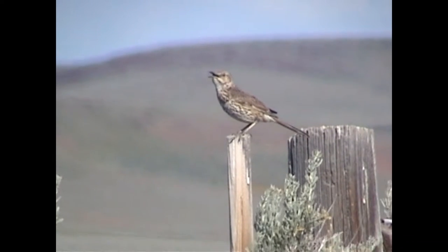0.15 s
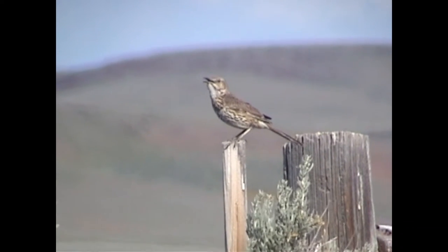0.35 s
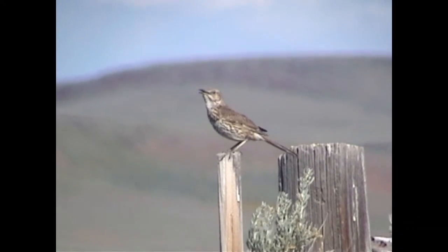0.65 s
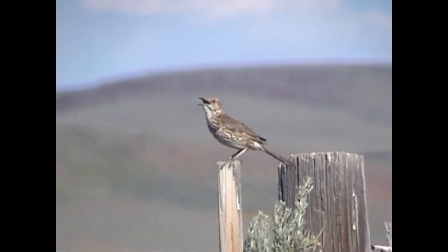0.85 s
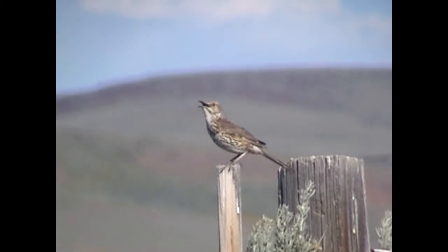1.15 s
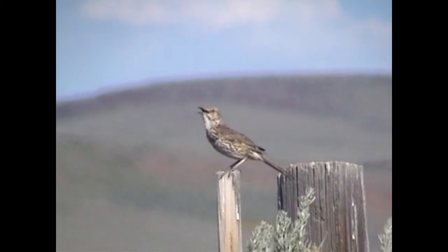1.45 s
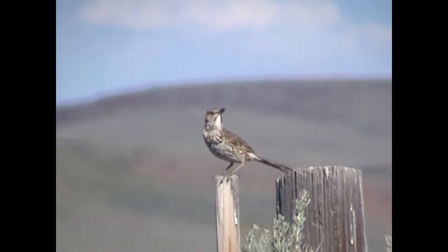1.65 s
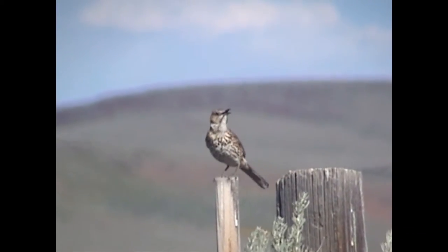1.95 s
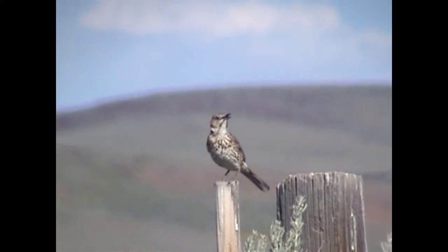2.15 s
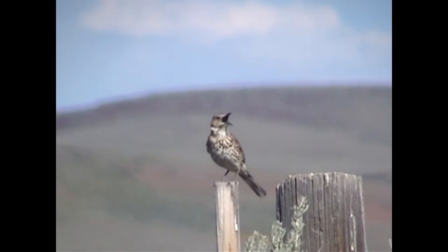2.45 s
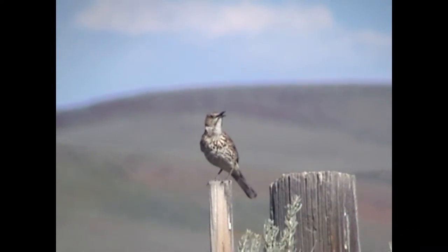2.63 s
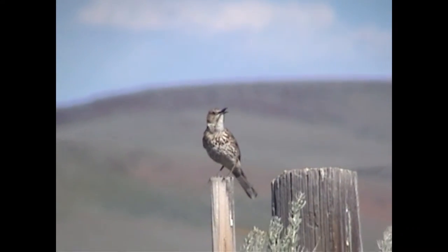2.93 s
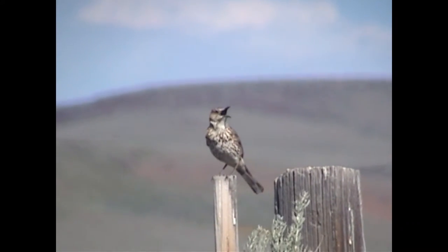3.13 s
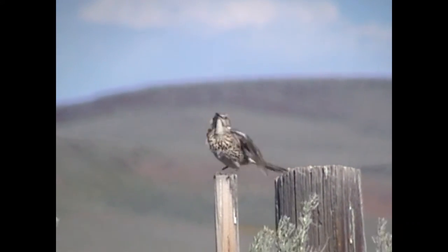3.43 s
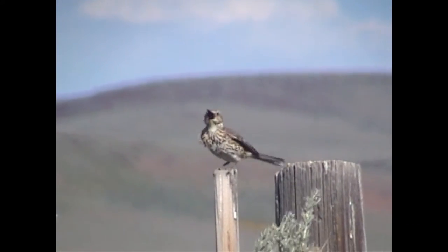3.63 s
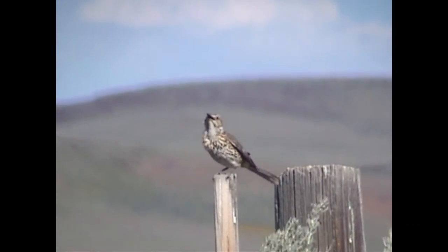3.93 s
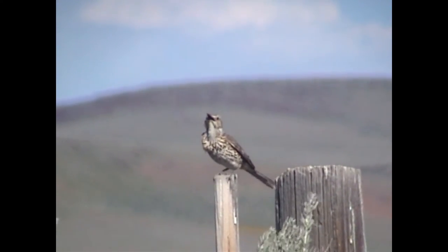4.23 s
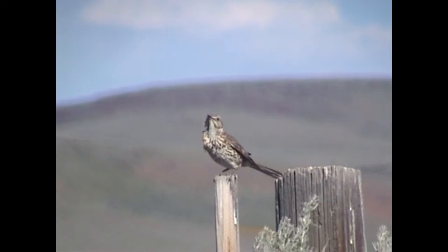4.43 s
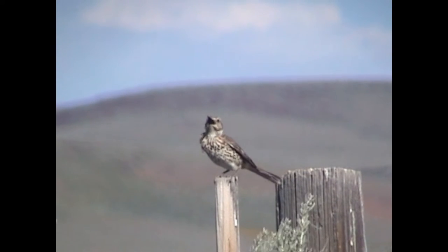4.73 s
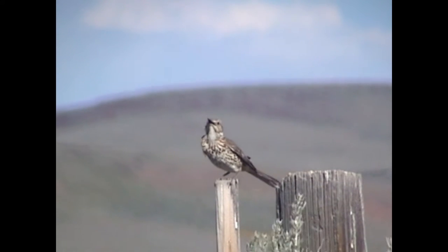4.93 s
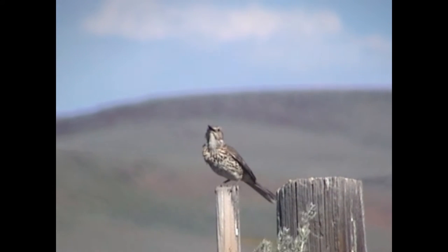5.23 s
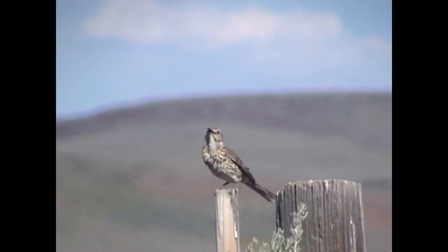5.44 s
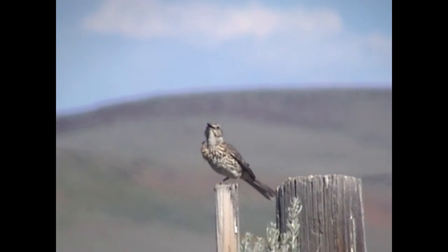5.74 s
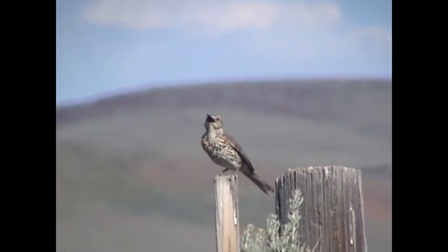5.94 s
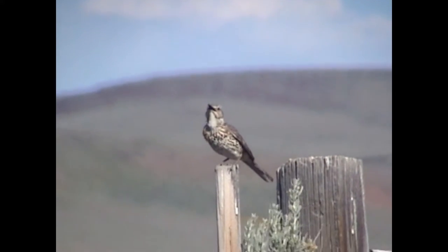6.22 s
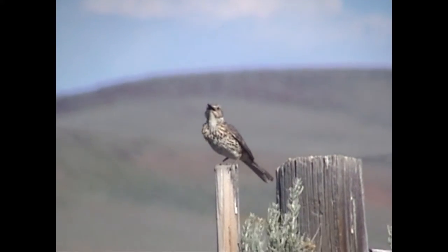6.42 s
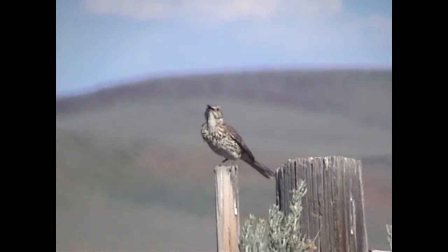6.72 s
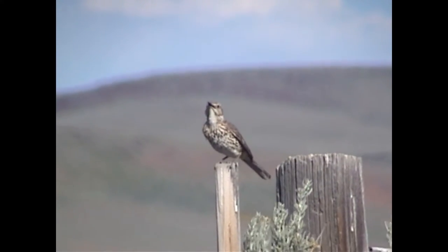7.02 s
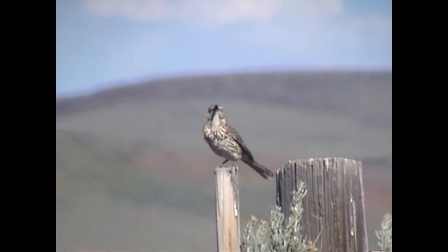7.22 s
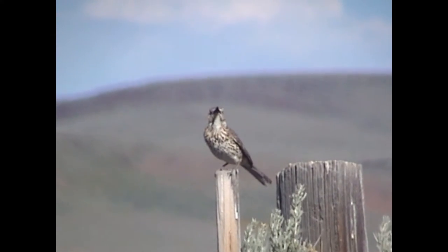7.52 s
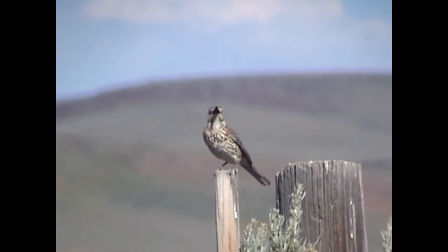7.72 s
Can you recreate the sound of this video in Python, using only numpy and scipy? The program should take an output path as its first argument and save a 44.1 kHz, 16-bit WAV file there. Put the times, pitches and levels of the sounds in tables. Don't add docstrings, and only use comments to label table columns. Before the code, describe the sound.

Open windy grassland, camcorder microphone without a windshield. A bird warbles continuously from the start, beginning with a falling trill and low whistles, then repeated buzzes, louder bright high notes and sweet sinking cadences, later rolling rattles and scooping chirps. Wind rumble rises in uneven gusts, strongest around four seconds and six to seven, sometimes distorting and crackling, then eases as jumbled chatter ends the song.

```python
import sys
import numpy as np
from scipy import signal
from scipy.fft import rfft, irfft, next_fast_len
from scipy.io import wavfile
from scipy.ndimage import uniform_filter1d, minimum_filter1d

SR = 44100
rng = np.random.default_rng(int(sys.argv[2]) if len(sys.argv) > 2 else 0)


def to_linear_factor(level_db):
    exponent = np.asarray(level_db, float) / 20
    return 10 ** exponent


def materialize(psi):
    bounded = np.clip(np.atleast_2d(psi).T, -1, 1)
    quanta = np.round(bounded * 32767).astype(np.int16)
    wavfile.write(sys.argv[1], SR, quanta)


N = 347067

# (throb_lead_warbles, first_throb_db, last_throb_db), then
# after_start_s, centre_hz, swing_hz, level_db, warbles_done.
PAIR = dict(strokes=[[(0, 1900, -37), (.014, 2150, -29), (.023, 2200, -37)], [(.016, 1620, -39),
        (.03, 1740, -33), (.043, 1740, -35), (.052, 1800, -43)]])
BUZZ = dict(strokes=[[(-.001, 1600, -29), (.003, 2250, -24)], [(-.001, 2800, -42), (.002, 4400, -44)]],
        trill=((.1, 3, 6), [(.002, 2230, 130, -23, .1), (.018, 2300, 120, -24, 2.4),
        (.021, 2320, 120, -35, 2.9), (.026, 2320, 150, -27, 3.6), (.042, 2380, 190, -32, 6),
        (.052, 2650, 60, -33, 7.5), (.062, 2600, 40, -42, 9)]))
ARCH = dict(strokes=[[(0, 3600, -25), (.012, 4750, -28), (.026, 4850, -27), (.036, 3900, -18)]])
SHIVER = dict(trill=((-.09, 3, 4), [(0, 3950, 230, -13.5, -.27), (.075, 4010, 75, -30, 4.9)]))
ROLL = dict(strokes=[[(0, 2250, -36), (.012, 2620, -24), (.02, 2850, -22), (.024, 4100, -37)],
        [(.066, 2300, -31), (.071, 1850, -35)], [(.079, 2000, -32), (.086, 2200, -36)]], trill=((.6, 3, 6),
        [(.027, 2760, 600, -23, .45), (.052, 2900, 750, -25, 2.25), (.067, 3200, 950, -27, 3.25),
        (.081, 3300, 900, -28, 4.2)]))
SCOOP = dict(strokes=[[(-.002, 2350, -35), (.008, 2900, -23), (.012, 3400, -29), (.019, 6000, -48)],
         [(.013, 1900, -35), (.021, 3500, -33), (.026, 2700, -24), (.031, 1940, -30), (.047, 1940, -28),
         (.068, 2040, -22.5), (.109, 1910, -26), (.118, 2850, -31)]])
CHIPS = dict(strokes=[[(-.002, 2350, -34), (.009, 2650, -27), (.013, 3100, -26)], [(-.004, 3800, -40),
         (0, 3200, -36)], [(.051, 2150, -33), (.066, 2720, -20), (.073, 2650, -30)], [(.05, 3600, -44),
         (.053, 2900, -40)]])
CADENCE = dict(strokes=[[(0, 2280, -33), (.015, 2490, -25), (.036, 2230, -20), (.089, 2255, -28)],
           [(.131, 2900, -33), (.139, 2420, -27), (.15, 2640, -20), (.156, 3300, -27), (.162, 2600, -21),
           (.171, 2250, -24)], [(.183, 2420, -27), (.197, 2130, -17), (.204, 2000, -27), (.208, 2350, -25),
           (.215, 2050, -27)]])
LADDER = dict(strokes=[[(0, 1850, -41), (.007, 2500, -33), (.042, 2680, -27), (.05, 2550, -23),
          (.068, 2530, -18), (.1, 2420, -24), (.106, 2600, -25)], [(.108, 2600, -24), (.125, 2480, -27),
          (.13, 2400, -26), (.139, 2520, -26), (.141, 2750, -25), (.146, 2500, -27), (.153, 2450, -33)],
          [(.157, 2350, -29), (.17, 2420, -24), (.175, 2720, -26), (.179, 2450, -29)]])


def bird(edge_share=.15, shortest_s=.003, longest_s=.007, waver=.0045, flutter_db=1.1):
    early_pipe = {2: [(3300, -31), (4000, -39), (4700, -43), (5400, -48), (6800, -46), (7800, -32),
                  (9800, -22)], 3: [(5000, -50), (7000, -50), (8000, -40), (10000, -48), (14000, -54)]}
    late_pipe = {2: [(3900, -26), (4500, -46), (5200, -42), (6200, -44), (7800, -33), (9600, -24)],
                 3: [(5500, -46), (6800, -44), (7800, -37), (9500, -46), (12000, -38), (14000, -45)]}
    turn_s = 3.66
    echo_db, echo_t60_s, echo_rise_s = -15, 0.092, 0.0019
    song = np.zeros(N)
    unsteady = np.pad([walk(260), walk(220)], ((0, 0), (0, SR)))
    for rows in song_notes():
        edge_s = np.clip(edge_share * (rows[-1][0] - rows[0][0]), shortest_s, longest_s)
        start, (hz, db) = played(rows, edge_s)
        drift, flutter = unsteady[:, max(int(start * SR), 0):][:, :len(hz)]
        strain = np.clip(np.abs(np.gradient(hz)) * SR / 40000, 0, 1)
        hz = hz * (1 + waver * drift * (1 + 7 * strain))
        db = db + flutter_db * flutter * (1 + 2.5 * strain)
        pipe = early_pipe if start < turn_s else late_pipe
        add(song, start, whistle(hz, db, edge_s, pipe, 3.5 * strain))
    t = np.arange(SR // 4) / SR
    tail = rng.standard_normal(len(t)) * to_linear_factor(-60 * t / echo_t60_s) * np.clip(t / echo_rise_s, 0, 1)
    tail = tail / np.sqrt(np.sum(tail ** 2))
    return song + to_linear_factor(echo_db) * signal.fftconvolve(song, tail)[:N]


def song_notes():
    # (throb_lead_warbles, first_throb_db, last_throb_db), then start_s,
    # centre_hz, swing_hz, level_db, warbles_done
    trills_and_steps = [
        ((.55, 1, 5), [(.29, 2560, 10, -29, -1.6), (.31, 2500, 20, -26, -1), (.352, 2400, 60, -30, .25), (.483, 2330, 110, -33, 4.25)]),
        ((-.1, 7, 5), [(2.301, 2100, 320, -37, .1), (2.315, 2170, 340, -25, 2.25), (2.334, 2200, 380, -23, 5.05)]),
        ((.4, 9, 1), [(2.669, 2516, 210, -41, -.5), (2.688, 2250, 80, -26, 1.7), (2.72, 2090, 16, -16, 3.5)]),
        ((-.2, 3, 2), [(5.85, 2950, 400, -30.5, -.16), (5.89, 2930, 830, -20.5, 4.27), (5.9035, 3200, 1200, -24, 5.25), (5.91, 3200, 1150, -26, 5.75)]),
        ((-.2, 4, 1), [(6.493, 2950, 350, -31, -.15), (6.531, 2950, 800, -24, 4.25), (6.5405, 3080, 1000, -25, 5.25), (6.555, 3350, 1430, -27, 6.25), (6.573, 3500, 1650, -27, 7.25), (6.593, 3050, 950, -27, 8.25), (6.6, 3000, 600, -36, 8.75), (6.612, 3000, 600, -27, 9.5)]),
                        ((.1, 4, 4), [(1.912, 1800, 120, -36, -.4), (1.922, 2150, 200, -34, .75), (1.949, 3750, 200, -19, 4.25), (1.96, 3950, 100, -30, 5.6)]),
        ((.1, 2, 3), [(1.911, 3400, 240, -32, -.4), (1.918, 3850, 200, -27, .3), (1.922, 4200, 400, -29, .75), (1.949, 7500, 400, -38, 4.25), (1.96, 7900, 200, -46, 5.6)]),
        ((.58, 7, 0.5), [(2.0, 2600, 200, -27, .3), (2.019, 2480, 200, -23, 1.25), (2.041, 2250, 90, -19, 2.25), (2.063, 2170, 30, -18, 3.25), (2.12, 2165, 5, -23, 5.8), (2.133, 2150, 5, -32, 6.4)]),
        ((.75, 9, 2), [(3.394, 2400, 240, -34, -.7), (3.415, 2150, 200, -25, 1.2), (3.438, 2000, 80, -24, 3.2)]),
        ((.5, 3, 3), [(3.516, 1900, 40, -31, .4), (3.64, 1190, 110, -52, 5.3)]),
        ((-.48, 12, -6), [(3.55, 3360, 238, -44.5, .87), (3.645, 2310, 234, -42, 4.66)]),
    ]
    # start_s, pitch_hz, level_db
    first_bends = [
        [(.568, 1915, -38), (.59, 1897, -26), (.692, 1850, -34)],
        [(.791, 4000, -38), (.7935, 4650, -34), (.798, 3200, -24), (.809, 2600, -30), (.814, 2800, -31),
         (.817, 2600, -32), (.8205, 3400, -28)],
        [(.822, 2777, -31.3), (.841, 3200, -25), (.848, 2630, -30), (.862, 2614, -20.5), (.982, 2528, -25.5)],
        [(2.434, 3200, -23.5), (2.442, 4850, -40), (2.46, 5050, -36.5), (2.484, 4950, -44)],
        [(2.55, 5070, -39), (2.56, 4600, -36.5), (2.578, 5050, -38), (2.6, 4950, -46)],
    ]
    # start_s, pitch_hz, level_db
    later_bends = [
        [(2.72, 2095, -18), (2.736, 2060, -18), (2.765, 1930, -23), (2.775, 1950, -34)],
        [(2.847, 2670, -21), (2.867, 2990, -23.2), (2.878, 2666, -20.5), (2.955, 2080, -28.5)],
        [(2.998, 2050, -26), (3.01, 2300, -20), (3.024, 2200, -16), (3.036, 2000, -25)],
        [(3.047, 2150, -27), (3.055, 2150, -20), (3.066, 1800, -26)],
        [(7.175, 2600, -38), (7.184, 3300, -19), (7.193, 3900, -23), (7.199, 5700, -37), (7.205, 4150, -25),
         (7.211, 4850, -35)],
        [(7.211, 4850, -35), (7.218, 4700, -34), (7.228, 4950, -33), (7.237, 4650, -32), (7.248, 5050, -34),
         (7.265, 4600, -41)],
        [(3.146, 6300, -50), (3.165, 4020, -27), (3.175, 3270, -20), (3.19, 2970, -36)],
        [(3.22, 2500, -34), (3.225, 3150, -22), (3.24, 3400, -18), (3.27, 3800, -22.5), (3.318, 4060, -39.5)],
    ]
    # start_s, pitch_hz, level_db
    chatter = [
        [(7.444, 3200, -28), (7.448, 2850, -24), (7.452, 2450, -30)],
        [(7.453, 2500, -36), (7.458, 3300, -29), (7.4605, 4250, -37), (7.464, 3500, -31), (7.468, 2900, -22),
         (7.472, 2400, -30)],
        [(7.471, 2950, -26), (7.476, 3050, -23), (7.479, 3700, -32), (7.484, 4400, -39)],
        [(7.458, 1800, -35), (7.463, 2400, -31)],
        [(7.477, 1750, -35), (7.485, 2250, -30)],
        [(7.494, 1900, -35), (7.503, 2900, -26), (7.507, 3500, -33), (7.512, 4300, -44)],
        [(7.494, 3100, -37), (7.498, 3600, -39)],
        [(7.505, 1700, -36), (7.511, 2100, -34)],
        [(7.517, 3000, -30), (7.522, 2250, -28), (7.529, 3000, -24), (7.534, 4100, -41)],
        [(7.531, 1750, -33), (7.537, 2600, -29), (7.54, 3100, -39)],
        [(7.543, 3100, -33), (7.547, 2200, -31), (7.554, 2850, -33), (7.558, 2500, -34)],
    ]
    # start_s, pitch_hz, level_db
    tags = [
        [(.228, 3480, -41), (.234, 3300, -39)],
        [(2.334, 2000, -28), (2.338, 2450, -20), (2.345, 2450, -19), (2.352, 1750, -31), (2.359, 1450, -41)],
        [(2.351, 3600, -38), (2.357, 3000, -38), (2.365, 3000, -43)],
        [(5.841, 2200, -42), (5.849, 2700, -32)],
        [(6.485, 2750, -39), (6.493, 2800, -34)],
        [(5.909, 2050, -33), (5.918, 2900, -21), (5.924, 3600, -26), (5.927, 4600, -36), (5.931, 4300, -39)],
        [(5.932, 3400, -30), (5.938, 1900, -38), (5.944, 2700, -31), (5.949, 2500, -36)],
        [(4.343, 2750, -27), (4.349, 2350, -27)],
        [(4.352, 2650, -31), (4.359, 2500, -33)],
        [(5.45, 2750, -31), (5.454, 2450, -31), (5.462, 2320, -26), (5.473, 2600, -31), (5.479, 2250, -34)],
    ]
    # start_s, length_s, from_hz, to_hz, loudest_db
    swelling = [(.259, .01, 3402, 2780, -30), (.278, .01, 3574, 2660, -36), (1.722, .023, 1750, 1990, -38),
                (.779, .009, 3700, 3700, -27), (2.425, .009, 5440, 3200, -23.5),
                (2.823, .014, 2580, 2980, -23), (3.692, .014, 2890, 3650, -27),
                (7.62, .012, 3130, 4170, -31), (7.722, .016, 2670, 3229, -25),
                (7.748, .011, 2200, 3500, -33), (7.728, .02, 1550, 2200, -33)]
    # start_s, length_s, from_hz, to_hz, loudest_db
    fading = [(0, .012, 3135, 3000, -24), (.775, .004, 3900, 3750, -40), (1.903, .008, 3200, 2300, -38),
              (1.745, .02, 1250, 1140, -43), (3.829, .016, 4670, 3610, -14), (4.932, .018, 4820, 3800, -27),
              (.242, .009, 3280, 3000, -33), (3.152, .006, 2900, 2850, -37), (5.768, .009, 1950, 1400, -36),
              (7.738, .012, 3229, 4170, -27), (7.787, .019, 2830, 1840, -39),
              (7.797, .012, 4800, 3200, -38)]
    # start_s, syllable, level_db, pitch_ratio, length_ratio
    returns = [(1.094, PAIR, 2, 1.02, 1.05), (1.16, BUZZ, 1, 1.01, 1.35), (1.282, PAIR, -2, .96, .95),
               (1.35, BUZZ, -.5, 1.01, .8), (1.459, PAIR, .5, 1.01, 1.01), (1.531, BUZZ, -5, 1.01, .8),
               (1.668, PAIR, -9, .95, 1.01), (3.704, ARCH, -.5, .995, .85), (3.735, SHIVER, 3, .995, .98),
               (3.907, CADENCE, .5, 1.003, 1.004), (4.802, ARCH, -1, 1.02, 1.18),
               (4.845, SHIVER, -3, 1.002, .94), (5.024, CADENCE, -.5, .997, 1.005),
               (4.162, LADDER, .5, 1.003, 1.003), (5.279, LADDER, -1, .99, .93),
               (5.541, ROLL, 1, 1.005, 1.03), (5.657, SCOOP, .5, .97, .89), (5.975, CHIPS, -.5, .98, 1.03),
               (6.138, ROLL, -2, .98, .97), (6.269, SCOOP, -.5, 1.002, 1.02), (6.641, CHIPS, .5, 1.02, .96),
               (6.802, ROLL, -1, 1.01, .98), (6.945, SCOOP, .5, .998, .98)]
    swell_db, fade_db = 9, 7
    out = first_bends + later_bends + chatter + tags
    out += [trill(*each) for each in trills_and_steps]
    for s, length_s, from_hz, to_hz, db in swelling:
        out.append([(s, from_hz, db - swell_db), (s + length_s, to_hz, db)])
    for s, length_s, from_hz, to_hz, db in fading:
        out.append([(s, from_hz, db), (s + length_s, to_hz, db - fade_db)])
    for s, syllable, db, pitch, length in returns:
        sung = [np.multiply(rows, (length, pitch, 1)) for rows in syllable.get("strokes", [])]
        if "trill" in syllable:
            throbbing, rows = syllable["trill"]
            sung.append(trill(throbbing, np.multiply(rows, (length, pitch, pitch, 1, length))))
        out += [rows + (s, 0, db) for rows in sung]
    return out


def trill(throbbing, rows):
    throat_width_hz = 305
    throat_sag = .12
    lead, *ends_db = throbbing
    s, *columns = np.transpose(rows)
    t = np.arange(s[0], s[-1], 1 / SR)
    centre_hz, swing_hz, db, turns = (np.interp(t, s, c) for c in columns)
    off_hz = swing_hz * np.sin(2 * np.pi * turns)
    throb_db = np.clip(np.linspace(*ends_db, len(t)), 0, 12) * np.sin(2 * np.pi * (turns + lead))
    detuning = (off_hz + throat_sag * swing_hz) / throat_width_hz
    dip_db = 10 * np.log10(1 + detuning ** 2)
    return np.transpose([t, centre_hz + off_hz, db + throb_db - dip_db])


def played(rows, edge_s):
    s, *columns = np.transpose(rows)
    t = np.arange(s[0] - edge_s / 2, s[-1] + edge_s / 2, 1 / SR)
    return t[0], [uniform_filter1d(np.interp(t, s, c), size=60, mode="nearest") for c in columns]


def whistle(hz, db, edge_s, pipe, strain_db):
    t = np.arange(len(hz)) / SR
    fade = np.sin(np.pi / 2 * np.clip(np.minimum(t, t[-1] - t) / edge_s, 0, 1)) ** 2
    phase = 2 * np.pi * np.cumsum(hz) / SR
    overtones = 0
    for k in pipe:
        overtones = overtones + to_linear_factor(np.interp(k * hz, *np.transpose(pipe[k]))) * np.sin(k * phase)
    return np.sqrt(2) * to_linear_factor(db) * fade * (np.sin(phase) + to_linear_factor(strain_db) * overtones)


def wind(buffet_db=4, edge_buffet_db=5.0, edge_db=-14, brighten=.25, swell_db=2.0):
    # frequency_hz, density_db
    rumble_shape = [(12, -36.5), (20, -18), (56, -1), (107, 2), (204, -7.5), (300, -23), (390, -38),
                    (660, -120)]
    # frequency_hz, density_db
    edge_shape = [(150, -17.5), (230, 1), (400, -11.5), (700, -26), (1200, -41.5), (2500, -52.5)]
    gust_edge_db = [-2, -1, 1, -3, 1, -3, 2, 1, -2, -2, 2, 2, -3, 3, -1, -1, 1, 3, 1, 1, 1, 1, -2, 2, -3, 1,
                    -1, 1, 1, 2]
    gust_db = gusts(0)
    lurch = 1.49 * np.tanh(walk(35) / 1.28)
    rumble = level(coloured(rumble_shape) * to_linear_factor(buffet_db * lurch), 0.3)
    edge_swing_db = edge_buffet_db * lurch + 3.5 * walk(70) + swell_db * walk(9)
    edge = level(coloured(edge_shape) * to_linear_factor(edge_swing_db), edge_db)
    return to_linear_factor(gust_db) * rumble + edge * to_linear_factor(gusts(gust_edge_db) + brighten * (gust_db + 12.5))


def gusts(lift_db):
    # peak_s, peak_db, rise_20db_s, fall_20db_s
    gust_table = [(.32, -31.5, 3.2, .11), (1.1, -21.5, .31, .082), (1.45, -19.5, .25, .24),
                  (2.02, -17.5, .17, .18), (2.27, -18.5, .07, .14), (2.52, -21.5, .27, .18),
                  (2.77, -12.5, .105, .3), (3.03, -16, .12, .16), (3.21, -18, .17, .15),
                  (3.651, -15, .093, .15), (3.93, -3.5, .083, .125), (4.01, -6, .14, .073),
                  (4.19, -17.5, .14, .16), (4.53, -13, .12, .37), (4.898, -11, .135, .23),
                  (5.165, -9.5, .21, .135), (5.39, -15.5, .1, .45), (5.601, -8.5, .25, .23),
                  (5.79, -10, .21, .22), (5.97, -4.5, .11, .12), (6.2, -13, .65, .09), (6.3, -6.5, .05, .4),
                  (6.76, -10, .7, .08), (6.879, -6, .08, .35), (7.511, -10, .39, .15),
                  (7.86, -22.5, .42, .3), (.62, -38, .2, .1), (.94, -29, .1, .25), (6.57, -7, .2, .2),
                  (7.3, -15, .15, .2)]
    lull_db = -48
    t = np.arange(N) / SR
    power = to_linear_factor(2 * lull_db)
    for (s, peak_db, rise_s, fall_s), lift in zip(gust_table, np.broadcast_to(lift_db, len(gust_table))):
        below_db = 20 * np.where(t < s, (s - t) / rise_s, (t - s) / fall_s)
        power = power + to_linear_factor(2 * (peak_db + lift - below_db))
    return 10 * np.log10(power)


def kinks(width_s=0.00028, boost_db=9):
    # centre_s, peak_db
    blows = [(3.9178, -20.5), (3.9374, -29), (3.9684, -26.5), (3.9903, -33.5), (5.1193, -29.5),
             (5.5598, -23.5), (5.979, -25), (6.2972, -26), (6.335, -28), (6.3755, -24), (6.5358, -20),
             (6.583, -21), (6.6245, -27), (4.027, -28), (5.7915, -30), (6.459, -30), (6.872, -29)]
    out = np.zeros(N)
    t = np.arange(-200, 201) / SR
    for s, db in blows:
        add(out, s + t[0], to_linear_factor(db + boost_db) * np.exp(-np.abs(t) / width_s))
    return out


def drop_click():
    click_s, step, decay_s = 4.7522, -0.36, 0.002
    t = np.arange(N) / SR - click_s
    return -step * (t < 0) * np.exp(-(t / decay_s) ** 2)


def preamplifier_hiss():
    # frequency_hz, density_db
    hiss_shape = [(88, -28), (150, -6.5), (321, -12.5), (555, -16), (1900, -26), (2360, -25), (4000, -29.5),
                  (15100, -34.5), (16000, -54.5)]
    return level(coloured(hiss_shape), -48.5) * to_linear_factor(0.52 * walk(2.8))


def coloured(shape):
    hz, db = np.transpose(shape)
    size = next_fast_len(N)
    axis = np.log(np.arange(size // 2 + 1) * SR / size + 1)
    gain = to_linear_factor(np.interp(axis, np.log(hz), db, left=-80, right=-80))
    return irfft(rfft(rng.standard_normal(size)) * gain, size)[:N]


def walk(rate):
    k = int(SR / rate)
    held = np.repeat(rng.standard_normal(N // k + 1), k)
    return 1.15 * uniform_filter1d(uniform_filter1d(held, k), k)[:N]


def level(x, db):
    return x * to_linear_factor(db) / np.sqrt(np.mean(x ** 2))


def add(out, s, x):
    i = max(int(s * SR), 0)
    out[i:i + len(x)] += x[:N - i]


def scene():
    fade = np.clip((N - np.arange(N)) / SR / 0.0074, 0, 1)
    mix = bird() + wind() + kinks() + drop_click() + preamplifier_hiss()
    return (mix * fade)[None]


def band_limit(x):
    return signal.sosfilt(signal.butter(12, 16490, fs=SR, output="sos"), x)


def record(dry):
    duck = np.minimum(1, .96 / (np.abs(dry) + 1e-9))
    gain = uniform_filter1d(minimum_filter1d(duck, size=601), size=601)
    low_pass = signal.ellip(8, .1, 60, 16400, fs=SR, output="sos")
    mix = signal.sosfilt(low_pass, dry * gain)
    return band_limit(mix)


dry = scene()
out = record(dry)
materialize(out)
```